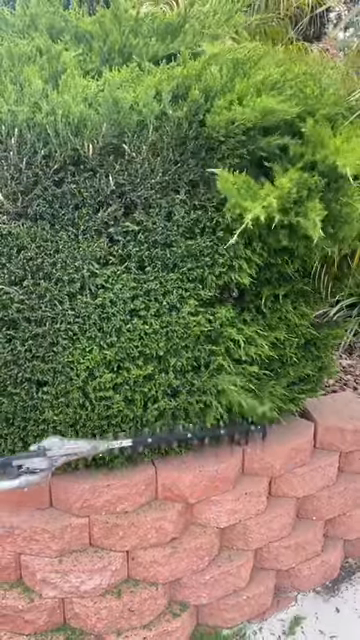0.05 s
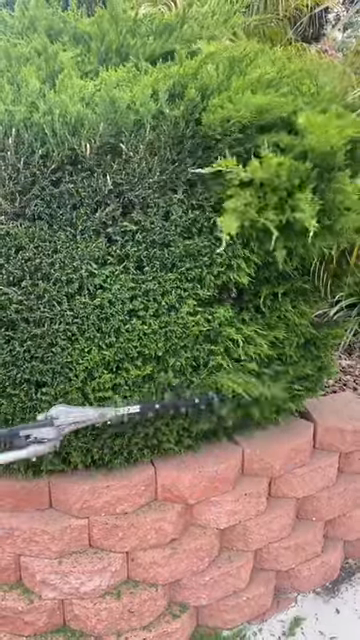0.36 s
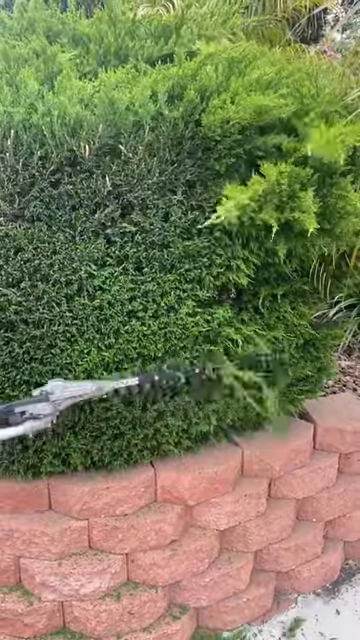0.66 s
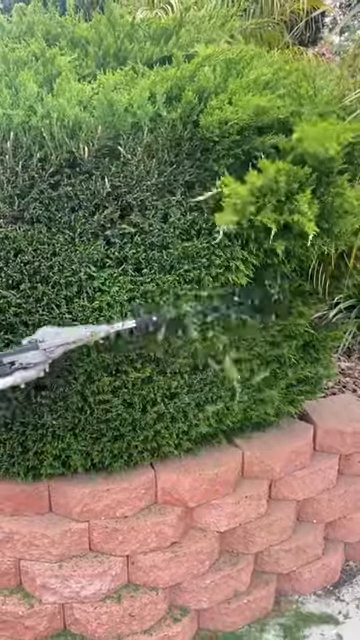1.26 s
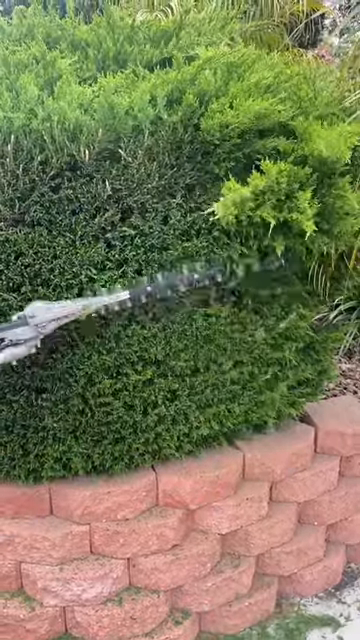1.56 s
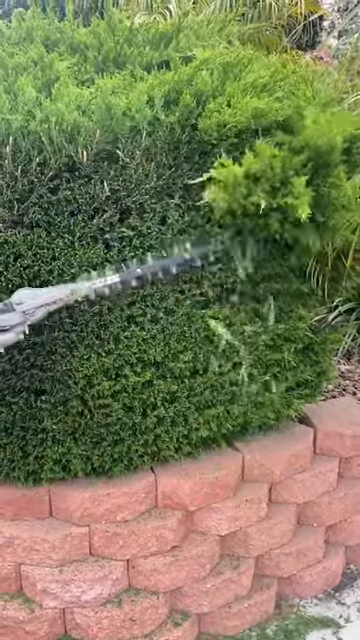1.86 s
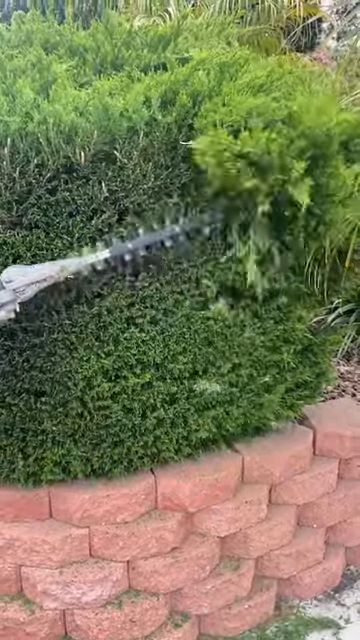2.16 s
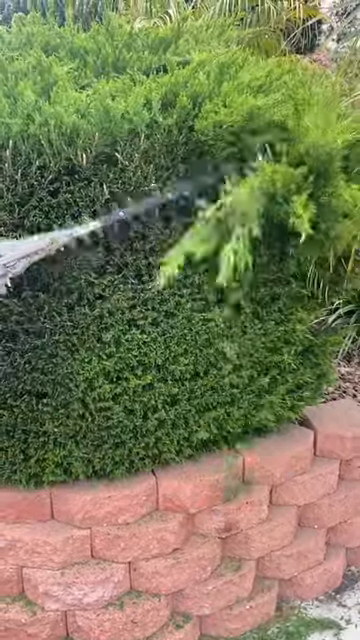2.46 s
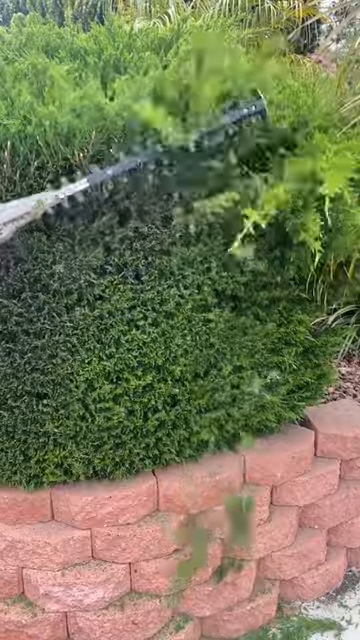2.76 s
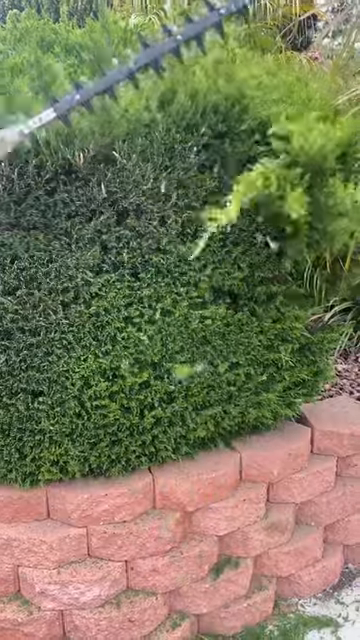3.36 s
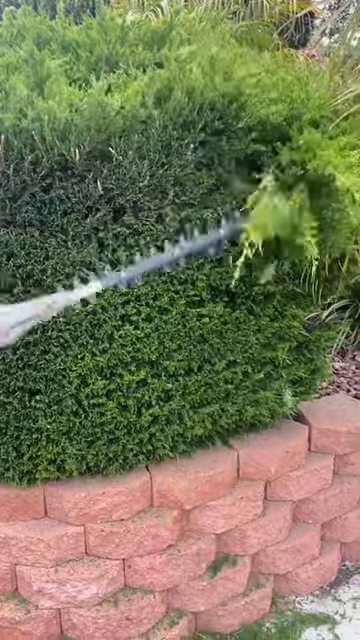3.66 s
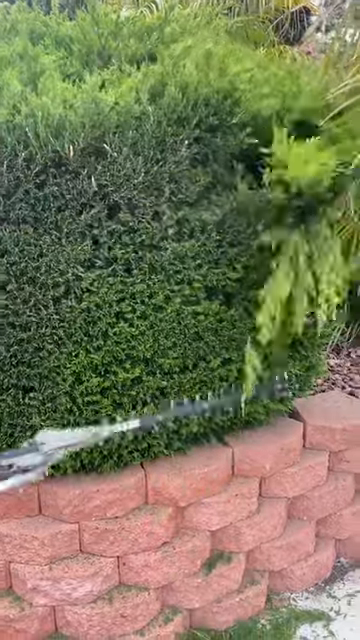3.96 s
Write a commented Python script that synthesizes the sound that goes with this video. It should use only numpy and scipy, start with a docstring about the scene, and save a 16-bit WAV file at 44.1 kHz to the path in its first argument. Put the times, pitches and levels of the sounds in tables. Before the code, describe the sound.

A two-stroke hedge trimmer runs close by outdoors, pulling up to speed in the first 0.7 seconds and holding a rough, buzzing drone. Its steel blades rattle, hiss and ring through the hedge, with a few sharp twig snaps between 0.1 and 2.5 seconds. At about 3 seconds the throttle closes, and the engine sputters, falling in pitch and level until 4 seconds.

```python
"""Outdoors at an evergreen hedge, a two-stroke trimmer sweeping upward close to a pair of microphone ports.
The engine pulls up to speed, runs free, firing only every third or fourth turn, and sputters down
from about 3.1 s. Over the exhaust drone the engine rattles, and the steel blades slide, clack and
ring through the foliage, snapping a few twigs."""
import sys
import numpy as np
from scipy import signal
from scipy.fft import rfft, irfft
from scipy.io import wavfile

SR = 44100
rng = np.random.default_rng(int(sys.argv[2]) if len(sys.argv) > 2 else 0)


def waveform_to_disk(signal):
    """Save audio, clipped to [-1, 1], as 16-bit WAV at the path in sys.argv[1]."""
    frames = np.transpose(np.atleast_2d(signal))
    scaled = np.clip(frames, -1, 1) * 32767
    samples = np.round(scaled).astype(np.int16)
    wavfile.write(sys.argv[1], SR, samples)


N = 176400


def from_db(db):
    """Decibels to gain."""
    return 10 ** (np.asarray(db) / 20)


def in_time(rows):
    """Each column of a timed curve at every sample."""
    times, *columns = np.transpose(rows)
    return [np.interp(np.arange(N) / SR, times, column) for column in columns]


def at_hz(points, hz):
    """Read a spectrum on a log-frequency axis."""
    freqs, values = np.transpose(points)
    return np.interp(np.log(np.maximum(hz, 1)), np.log(freqs), values)


def bins():
    """Frequencies of a whole-length spectrum."""
    return np.arange(N // 2 + 1) * SR / N


def drift(rate_hz):
    """Random wander with spread 1, mostly slower than the given rate."""
    slow = irfft(rfft(rng.standard_normal(N)) / (1 + (bins() / rate_hz) ** 2), N)
    return slow / slow.std()


def resonance(hz, width_hz):
    """A tone of rms about 1 whose strength and phase wander, widening it into a narrow band."""
    wander = drift(width_hz) + 1j * drift(width_hz)
    return np.real(wander * np.exp(2j * np.pi * np.cumsum(hz * np.ones(N)) / SR))


def causal(colour):
    """Minimum-phase response through rows of freq_hz, gain_db."""
    cepstrum = irfft(np.log(from_db(at_hz(colour, bins()))), N)
    return np.exp(rfft(cepstrum * (1 + np.sign(np.arange(N))) * (np.arange(N) < N // 2)))


def ports(hz, width=1):
    """Complex gain at the left and right microphone ports; width scales the phase between them."""
    balance = [(100, 0), (175, -1.7), (350, -3.5), (480, -7.5), (540, -8), (680, -2), (850, -0.5),
               (1050, 0.5), (1500, -1.5), (2600, -2.5), (4000, -1.5), (6000, 0.5), (7000, -1.5)]  # freq_hz, left_minus_right_db
    lead = [(30, 0), (350, -.1), (500, .6), (650, 2.1), (1000, 1.8), (1400, 1), (1700, 0), (2600, .6),
            (3600, .4), (4400, .9), (5250, .1), (6000, 1.5), (6600, 2.3), (6950, 3.05), (7900, 3.2),
            (8400, 4.1), (9000, 4.9), (9800, 6.2), (11600, 6.4), (12200, 8), (12600, 9.4)]  # freq_hz, left_lead_rad
    side = np.array([[.5], [-.5]])
    gain = from_db(side * at_hz(balance, hz))
    return gain / np.sqrt(np.mean(gain ** 2, axis=0)) * np.exp(1j * side * width * at_hz(lead, hz))


def scattered(direct, diffuse):
    """Stereo spectrum of a direct sound plus scatter that differs at each port."""
    likeness = [(150, 1), (400, .95), (600, 0.71), (1400, 0.42), (1850, 0.89), (2800, 0.24), (4000, 0.72),
                (5200, 0.9), (6000, 0.81), (6600, 1), (7050, 1), (7900, 1), (8500, 1), (9300, 0.82),
                (10000, 1), (11500, 0.81), (12000, 0.6), (12700, 1)]  # sound common to both ports: freq_hz, power_share
    alike = np.clip(at_hz(likeness, bins()), 0, 1)
    return ports(bins()) * (np.sqrt(alike) * rfft(direct) + np.sqrt(1 - alike) * rfft(diffuse))


def pulses(clicks, colour):
    """Each click becomes a pulse of the same height with the given spectrum, then reaches both ports."""
    response = causal(colour)
    return irfft(rfft(clicks) * response * ports(bins()), N) / np.abs(irfft(response, N)).max()


def coasting_share():
    """0 while the throttle is open, 1 once it is shut."""
    throttle_off_s, fade_s = 2.96, 0.18
    return np.clip((np.arange(N) / SR - throttle_off_s) / fade_s, 0, 1)


def exhaust_drone(speed, turns, upper_db, load):
    """The exhaust opens once a turn: harmonics, the upper ones following the load, unsteady on coasting."""
    # the five lowest harmonics, each: time_s, level_db
    first = [(0, -53), (.13, -31), (.25, -31.5), (.48, -28), (.75, -35.5), (1.4, -35.5), (2.2, -37.5),
             (3.08, -41), (3.22, -36), (3.43, -43), (3.55, -39.5), (3.85, -46.5), (4, -61)]
    second = [(0, -53), (.17, -36), (.4, -37), (.6, -42), (1.3, -41), (1.48, -35), (1.65, -39.5),
              (1.9, -34.5), (2.5, -33), (2.8, -30), (3.02, -33), (3.12, -44), (3.45, -52.5), (4, -50)]
    third = [(0, -32), (.2, -31.5), (.55, -31.5), (.8, -35), (1.3, -33.5), (1.45, -37), (1.7, -34),
             (2.08, -35), (2.22, -43), (2.35, -34), (2.55, -37), (2.72, -41), (2.85, -37), (2.97, -42),
             (3.4, -40.5), (3.65, -48), (4, -42.5)]
    fourth = [(0, -38.5), (.12, -29.5), (.5, -25.5), (.95, -33), (1.22, -32), (1.35, -40), (1.65, -41.5),
              (2.0, -36), (2.4, -35.5), (2.62, -32.5), (3.0, -33), (3.25, -53), (3.7, -50), (4, -43)]
    fifth = [(0, -47), (.1, -40), (.2, -31.5), (.48, -30), (.85, -42), (1.35, -42), (1.6, -37.5),
             (2.1, -38.5), (2.25, -32.5), (2.42, -40), (3.1, -36), (3.35, -53), (4, -51)]
    upper_harmonics = [(6, -46.5, -32.5, -46.5), (7, -36.5, -41.5, -46.5), (8, -41, -49, -50.5),
                       (9, -48, -54, -51.5), (10, -40.5, -50, -56), (12, -37, -56, -62),
                       (14, -56, -48, -49.5), (15, -43, -44.5, -53)]  # multiple_of_speed, loaded_db, free_db, coasting_db
    waver_db, coast_waver_db = 0.87, 4
    coast = coasting_share()
    rough_db = 1.36 * drift(35)  # common to all the upper harmonics
    levels = [(k, in_time(curve)[0]) for k, curve in enumerate((first, second, third, fourth, fifth), 1)]
    for k, loaded_db, free_db, coasting_db in upper_harmonics:
        driven_db = load * loaded_db + (1 - load) * free_db
        unsteady_db = (waver_db + coast_waver_db * coast) * drift(9.6) + rough_db
        levels.append((k, upper_db + (1 - coast) * driven_db + coast * coasting_db + unsteady_db))
    width = 1 - 0.72 * load  # the image narrows under load
    drone = 0
    for k, db in levels:
        tone = np.exp(2j * np.pi * (k * turns + rng.random())) * from_db(db)
        drone = drone + np.sqrt(2) * np.real(tone * ports(k * speed, width))
    return drone


def firings(turns, strength_db):
    """Every few turns the charge catches: that puff is stronger than the mean, the misses weaker."""
    pattern = [(0, 3), (.77, 4), (1.12, 3.5), (1.42, 4), (1.76, 3.3), (1.95, 4), (2.25, 3.3), (2.4, 4),
               (3.06, 5.5), (3.3, 3.5), (3.7, 2.5)]  # spacing of the firings: start_s, mean_gap_turns
    muffler = [(25, -47), (45, -7.5), (87, -2.5), (130, -16), (215, -11.5), (250, -13), (283, 0),
               (390, 0.5), (470, -9.5), (620, 1), (780, -4.5), (900, -9.5), (1080, -2), (1300, -10),
               (2500, -14.5), (6000, -34), (15000, -50)]  # a firing heard through the muffler: freq_hz, gain_db
    boost_db, spread_db = 16.5, 0.73
    starts, gaps = np.transpose(pattern)
    openings = np.searchsorted(turns, np.arange(1, int(turns[-1])))
    pops, turn = np.zeros(N), 0
    while turn < len(openings):
        at = openings[turn]
        gap = int(gaps[np.searchsorted(starts, at / SR, "right") - 1] + rng.random())
        size = from_db(boost_db + strength_db[at] + spread_db * rng.standard_normal())
        pops[openings[turn:turn + gap]] -= size / gap
        pops[at] += size
        turn += gap
    return irfft(rfft(pops) * causal(muffler) * ports(bins()), N)


def rattle(turns):
    """Dense steel contacts swell with each piston slap and blade stroke; five registers flutter apart."""
    colour = [(25, -107), (60, -68), (200, -72.5), (330, -70), (600, -64), (1100, -63), (1500, -66),
              (2000, -63.5), (2550, -63.5), (3100, -64), (3600, -65), (4000, -64), (4850, -64),
              (5600, -64.5), (6600, -65), (7300, -67), (8100, -67.5), (9500, -74), (11000, -76),
              (12500, -83), (14000, -90), (15500, -104)]  # spectrum of the contacts: freq_hz, density_db
    centres_hz = [450, 1200, 3700, 5300, 11000]  # the registers, bass to top: centre_hz
    # register gains: time_s, bass_db, low_mid_db, high_mid_db, treble_db, top_db
    register_gains = [(0, 7, 3.5, 0, 2.5, -0.5), (.15, 8, 0, 0.5, 6, 1.5), (.45, 0, 2.5, 4, 7, 2),
                      (.85, -2, 1, -1, 3.5, 3), (1.25, -1, 1, 0, 2, 3), (2, -4, 0, 0, 0, -0.5),
                      (2.96, -1, -3.5, 1, 0, 0), (3.25, -7, -9, -0.5, -2, -3),
                      (3.58, -2.5, -7, -6.5, -5, -4), (3.82, -4, -5.5, -7.5, -7, -8.5),
                      (4, -4, -13, -5.5, -4, -6)]
    slap_depth, clack_depth, strokes_per_turn = 0.075, .09, 0.47
    flutter_db, surge_db = 1.04, .5
    slap = slap_depth * np.cos(2 * np.pi * turns)
    clack = clack_depth * np.cos(2 * np.pi * strokes_per_turn * turns)
    contacts = rng.standard_normal((3, N)) * np.exp(slap + clack)
    spectrum = scattered(contacts[0], contacts[1:]) * causal(colour) * np.sqrt(SR / 2)
    out = 0
    for weights, db in zip(np.eye(len(centres_hz)), in_time(register_gains)):
        share = at_hz(list(zip(centres_hz, weights)), bins())
        gain = from_db(db + flutter_db * drift(90) + surge_db * drift(9))
        out = out + gain * irfft(spectrum * share, N)
    return out


def blade_ring():
    """Friction keeps one high resonance of the blades singing."""
    ring = [(0, -42), (.45, -37), (.9, -37), (1.15, -29), (1.5, -27), (2.05, -37), (2.2, -40), (2.4, -32),
            (2.9, -35), (3.1, -41), (4, -49)]  # time_s, level_db
    return from_db(in_time(ring)[0]) * resonance(hz=7110, width_hz=100)


def blade_hiss():
    """The sliding blades hiss as they speed up."""
    hiss = [(0, 6020, -30), (.2, 6560, -28.5), (.6, 6830, -30.5), (.85, 6846, -28), (1.1, 7100, -46),
            (4, 6850, -65)]  # time_s, centre_hz, level_db
    centre_hz, level_db = in_time(hiss)
    return from_db(level_db) * resonance(centre_hz, width_hz=270)


def bar_chatter():
    """The shaken cutter bar chatters at its lower resonances."""
    modes = [(2287, 77.6, -44.5), (2464, 57, -46), (2692, 110, -45), (4905, 210, -41.5)]  # pitch_hz, width_hz, level_db
    shaking = [(0, -1), (.5, -2), (1, 2.5), (1.5, 2.5), (2.1, 2.5), (2.55, 4.5), (3.05, 3.5), (3.4, -4),
               (3.7, -2.5), (4, -23)]  # how hard the bar is shaken: time_s, gain_db
    chatter_db = 1.5 * drift(25)
    ringing = sum(from_db(db) * resonance(hz, width_hz) for hz, width_hz, db in modes)
    return from_db(in_time(shaking)[0] + chatter_db) * ringing


def bar_whine():
    """The bar whines while it is in the foliage."""
    whine = [(0, -56), (1.0, -49), (1.35, -40), (1.75, -38.5), (1.95, -50), (2.3, -48), (2.55, -42.5),
             (3.0, -41), (3.4, -46.5), (4, -62)]  # time_s, level_db
    return from_db(in_time(whine)[0]) * resonance(hz=2597, width_hz=18)


def twig_snaps():
    """The teeth shear through twigs with a sharp tick."""
    snaps = [(.104, -8), (.705, -12), (.763, -13), (.99, -13), (1.282, -12), (1.362, -14), (2.311, -15),
             (2.521, -13)]  # start_s, peak_db
    colour = [(200, -30), (1200, -4), (5000, 1), (8000, -6), (12000, -12), (15000, -33)]  # spectrum of a snap: freq_hz, gain_db
    start_s, peak_db = np.transpose(snaps)
    clicks = np.zeros(N)
    clicks[(start_s * SR).astype(int)] = from_db(peak_db)
    return pulses(clicks, colour)


def sputter(speed):
    """With the throttle shut, stray charges catch and puff through the muffler for a few fading turns."""
    puffs = [(3.058, 2, -26), (3.08, 2, -25), (3.108, 2, -28), (3.149, 3, -24), (3.187, 4, -24),
             (3.232, 3, -25.5), (3.278, 2, -27), (3.311, 3, -30), (3.345, 3, -29), (3.375, 3, -28),
             (3.439, 3, -30), (3.531, 2, -29), (3.587, 2, -31), (3.653, 2, -28), (3.74, 2, -32)]  # start_s, length_turns, peak_db
    colour = [(60, -35), (160, -12), (240, -15), (330, -1.5), (470, 3), (620, -13), (1200, -24),
              (4000, -38.5)]  # spectrum of a puff: freq_hz, gain_db
    loss_db_per_turn = 1
    clicks = np.zeros(N)
    for start_s, length_turns, peak_db in puffs:
        for turn in range(length_turns):
            time_s = start_s + turn / speed[int(start_s * SR)]
            clicks[int(time_s * SR)] -= from_db(peak_db - loss_db_per_turn * turn)
    return pulses(clicks, colour)


def scene():
    """One crankshaft drives the exhaust and the blades; it turns less evenly when coasting."""
    crankshaft = [(0.0, 143), (0.09, 152), (0.22, 159), (0.38, 166), (0.63, 169.7), (0.77, 173),
                  (1.01, 169.4), (1.27, 174.6), (1.34, 172), (1.44, 173), (1.64, 174), (1.76, 174),
                  (1.86, 175), (1.94, 174.5), (2.0, 175), (2.16, 171.6), (2.24, 171.4), (2.34, 175.5),
                  (2.49, 176.3), (2.67, 172), (2.84, 176.3), (2.91, 175.8), (2.96, 172.8), (3.06, 171.6),
                  (3.2, 161), (3.4, 137), (3.52, 127.2), (3.64, 120), (3.79, 110), (4.0, 93)]  # time_s, turns_per_s
    effort = [(0, -6, 0.7, -7.5), (.2, 2, 0.8, 0), (.5, -3, 0.93, 2.5), (.75, -4, 0.76, -1),
              (1.15, -2, 0.38, -3), (1.4, -1.5, 0.05, -2.5), (1.9, 1.5, 0.04, -2), (2.2, 1, 0.1, -2),
              (2.9, 0, 0, -1), (3.2, 1, 0, -7.5), (3.5, 0, 0, -14), (3.72, -0.5, 0.09, -11.5),
              (3.95, -1, 0.05, -7.5)]  # the engine's effort: time_s, upper_harmonics_db, load_share, firing_db
    speed, = in_time(crankshaft)
    upper_db, load, firing_db = in_time(effort)
    jitter_turns = 0.0056 * drift(35) + 0.012 * coasting_share() * drift(30.2)
    turns = np.cumsum(speed) / SR + jitter_turns
    exhaust = exhaust_drone(speed, turns, upper_db, load) + firings(turns, firing_db) + sputter(speed)
    rattling = rattle(turns)
    steel = blade_ring() + blade_hiss() + bar_chatter() + bar_whine()
    steel_at_ports = irfft(rfft(steel) * ports(bins()), N)
    return exhaust + rattling + steel_at_ports + twig_snaps()


def record(dry):
    """A steep low-pass cuts the very top."""
    stopband_hz = 16000
    return signal.sosfilt(signal.cheby2(12, 60, stopband_hz, fs=SR, output="sos"), dry)


dry = scene()
out = record(dry)
waveform_to_disk(out)
```